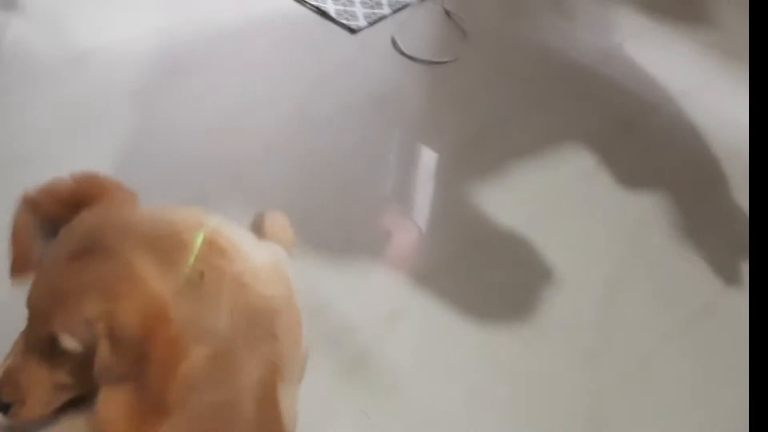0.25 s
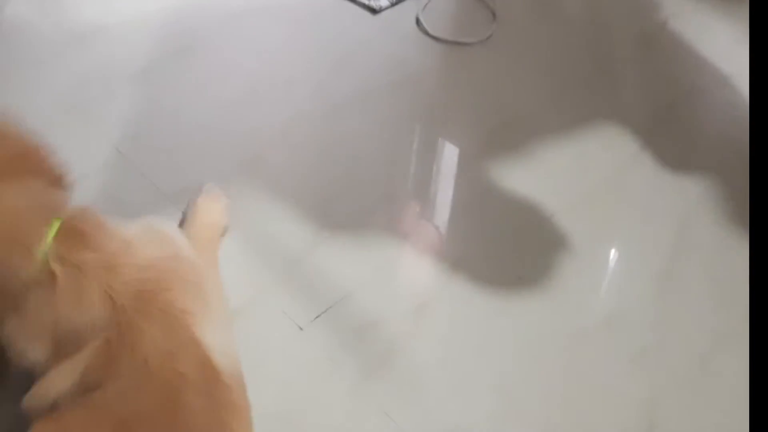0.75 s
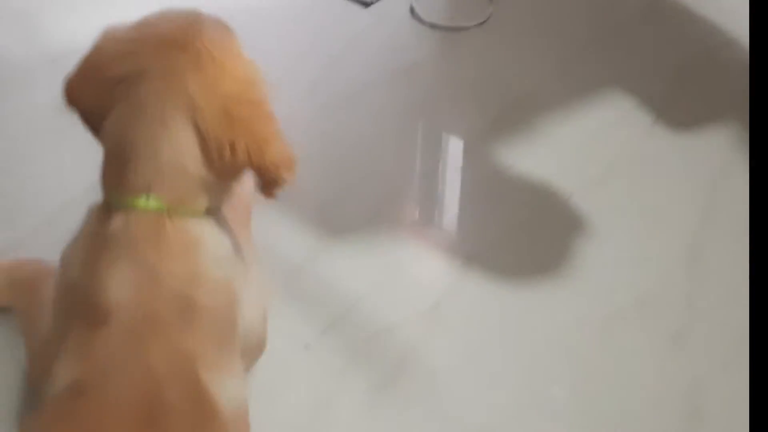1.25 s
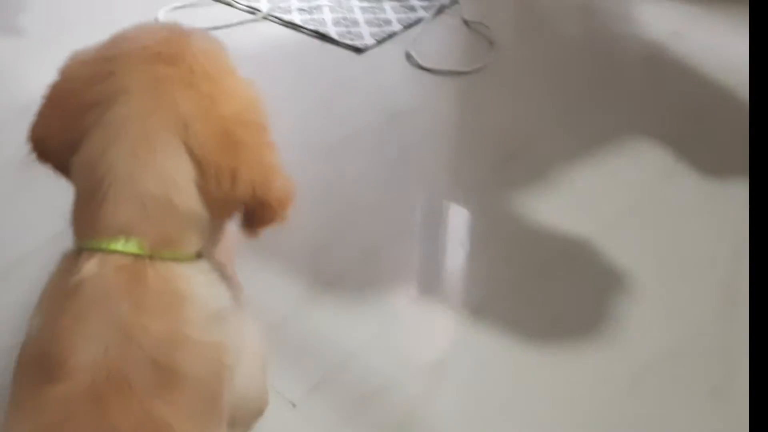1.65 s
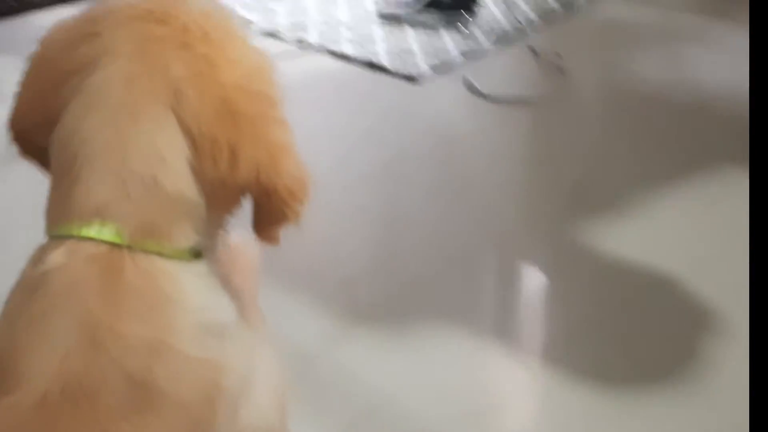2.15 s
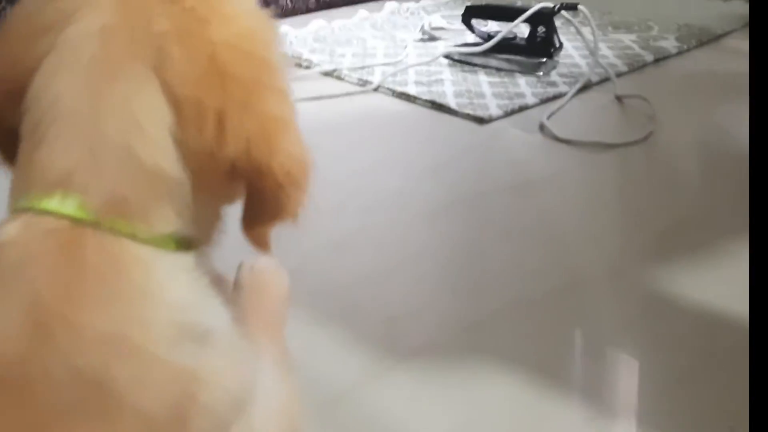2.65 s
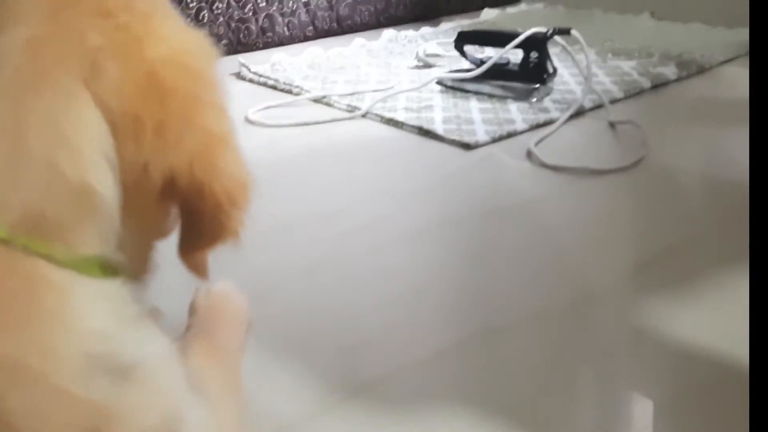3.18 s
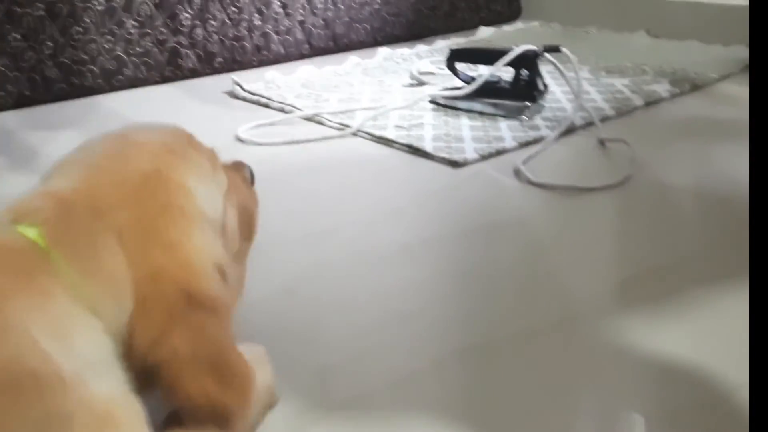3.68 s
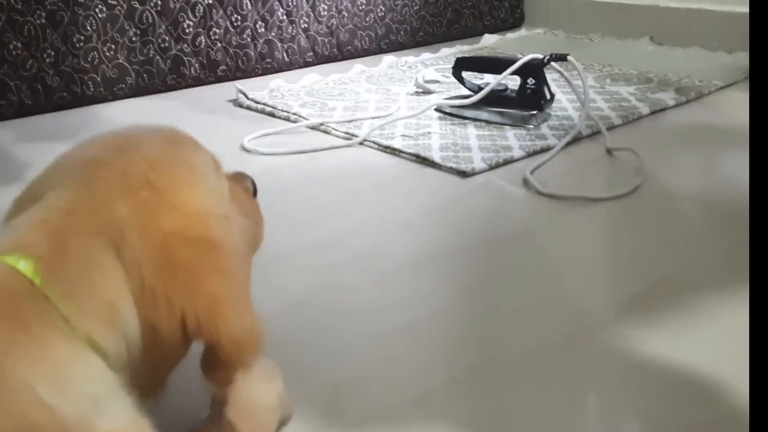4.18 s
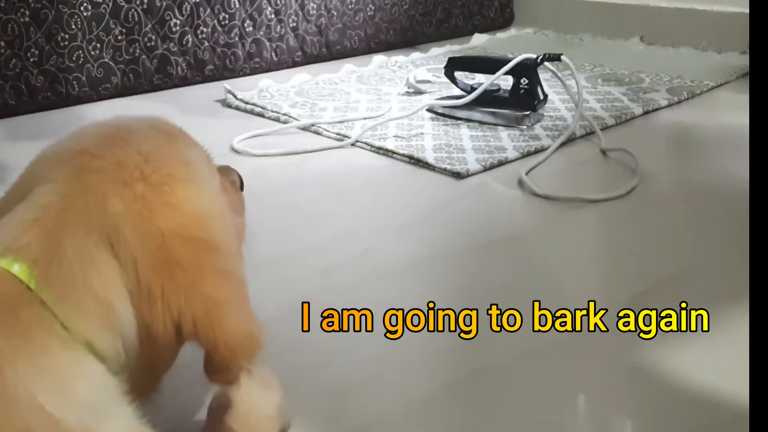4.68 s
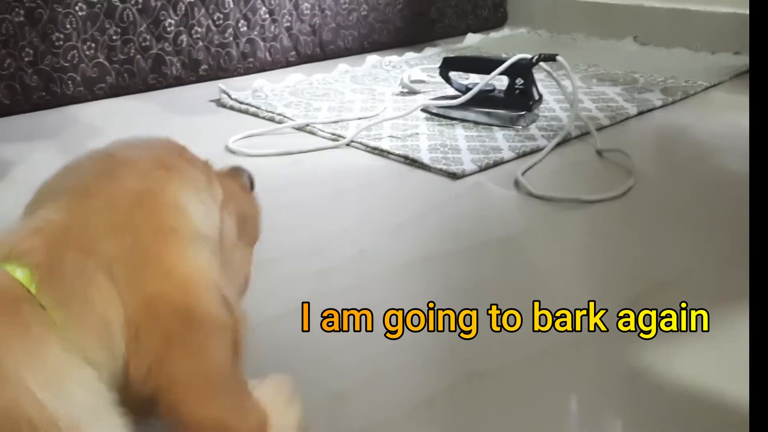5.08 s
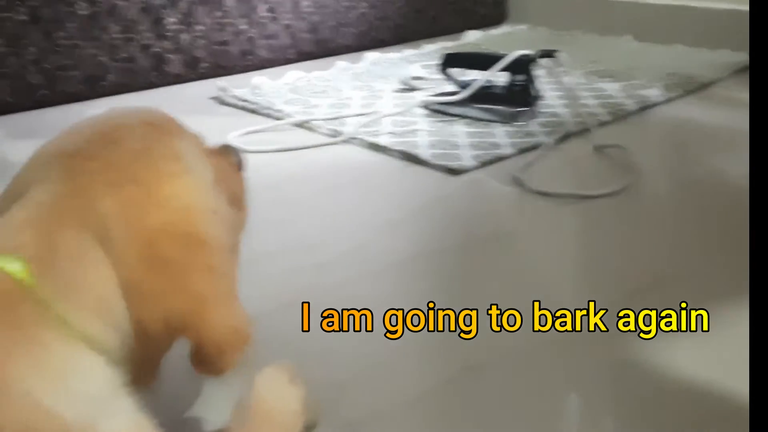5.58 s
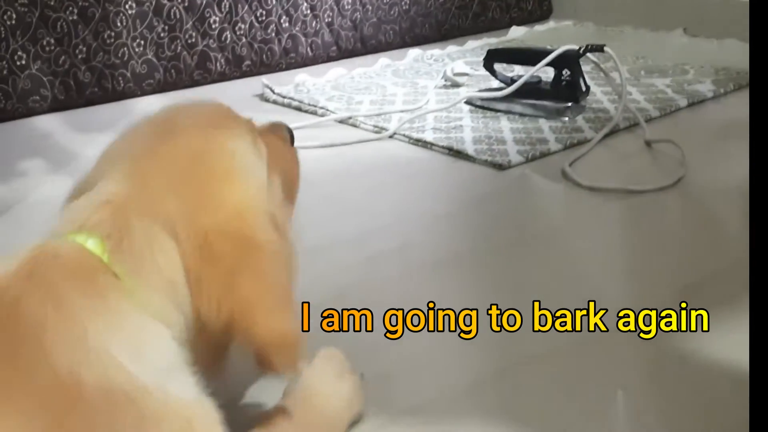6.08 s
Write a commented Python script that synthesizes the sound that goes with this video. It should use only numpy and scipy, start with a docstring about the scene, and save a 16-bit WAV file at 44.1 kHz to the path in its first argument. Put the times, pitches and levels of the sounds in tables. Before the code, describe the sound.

One short puppy bark, a swell of rushing air with low wind thumps, then three more hoarse-edged yaps echoing briefly off hard floor.

```python
"""The hoarse tail of an earlier bark fades over a faint low tone as a puppy starts the first of four barks.
It faces away from a handheld microphone with two ports, in a tiled room.
Each bark is a voice that swoops up as a nearly pure tone, breaks into a rasp and sinks to a growl.
Filtered noise makes a fan's rush, heard louder between the first two barks, and its draught on the ports.
A soft rub, a tiny tick and a knock of coloured noise mark the puppy moving on the floor."""
import sys
import numpy as np
from scipy import signal
from scipy.fft import rfft, irfft
from scipy.io import wavfile
from scipy.ndimage import uniform_filter1d, minimum_filter1d

SR = 44100
rng = np.random.default_rng(int(sys.argv[2]) if len(sys.argv) > 2 else 0)


def int16_out(signal):
    """Quantize to a 16-bit WAV file."""
    q = np.round(np.clip(np.atleast_2d(signal).T, -1, 1) * 32767)
    wavfile.write(sys.argv[1], SR, q.astype(np.int16))


N = 279153
TIME = np.arange(N) / SR


def amp(db):
    """Decibels to gain."""
    return 10 ** (np.asarray(db) / 20)


def unit(x):
    """Scales to rms 1."""
    return x / np.sqrt(np.mean(x ** 2) + 1e-20)


def read(points, hz):
    """Reads a table on a log-frequency axis."""
    f, value = np.transpose(points)
    return np.interp(np.log(hz + 1), np.log(f + 1), value)


def follow(rows, t):
    """Reads every column of a curve at times t."""
    s, *columns = np.transpose(rows)
    return [np.interp(t, s, c) for c in columns]


def add(mix, s, sound):
    """Lays a sound into the mix at time s."""
    part = mix[..., max(round(s * SR), 0):][..., :sound.shape[-1]]
    part += sound[..., :part.shape[-1]]


def colour(x, points):
    """Gives x a spectrum, at rms 1."""
    n = x.shape[-1]
    gain = amp(read(points, np.fft.rfftfreq(n, 1 / SR)))
    return unit(irfft(rfft(x) * gain, n))


def wander(size, rate_hz):
    """Smooth random curve of rms 1, mostly slower than the rate."""
    hz = np.fft.rfftfreq(size, 1 / SR)
    slow = np.exp(-(hz / rate_hz) ** 2) * (hz > 0)
    return unit(irfft(rfft(rng.standard_normal(size)) * slow, size))


def cut(x, hz, kind, order):
    """A low-pass or high-pass."""
    return signal.sosfilt(signal.butter(order, hz, kind, fs=SR, output="sos"), x)


def resonate(x, hz, width):
    """A resonance of gain 1 with steep skirts: shifts the curve hz to zero, smooths twice, shifts back."""
    turn = np.exp(2j * np.pi * np.cumsum(hz) / SR)
    r = np.exp(-np.pi * width * np.sqrt(2) / SR)
    smooth = signal.lfilter([(1 - r) ** 2], [1, -2 * r, r * r], x / turn)
    return 2 * (turn * smooth).real


def steady(x, size=700):
    """Holds the short-time rms at 1."""
    return x / np.sqrt(abs(uniform_filter1d(x ** 2, size)) + 1e-12)


def sides(pan_db):
    """Left and right gains of equal total power."""
    gains = amp(np.array([pan_db, -pan_db]) / 2)
    return gains / np.sqrt(np.mean(gains ** 2, axis=0))


def delay(x, ms):
    """Delays by any time, fractions of a sample included."""
    shift = np.exp(-2j * np.pi * np.fft.rfftfreq(2 * N, 1 / SR) * ms / 1000)
    return irfft(rfft(x, 2 * N) * shift, 2 * N)[:N]


def reflect(x, t60s, start_s):
    """Sparse reflections of random sign, different at each port, each band dying at its own speed."""
    size = SR // 2
    taps = rng.choice([-1., 1.], (2, size)) * (rng.random((2, size)) < 1 / 10) * (TIME[:size] > start_s)
    hz, t, z = signal.stft(taps, SR, nperseg=256)
    decay = np.exp(-np.log(1000) * t / read(t60s, hz)[:, None])
    tail = signal.istft(z * decay, SR, nperseg=256)[1]
    tail = tail / np.linalg.norm(tail, axis=1, keepdims=True)
    return signal.fftconvolve(x[None], tail, axes=1)[:, :N]


def fan(soft_db=-57, hum_hz=62, hum_db=-7):
    """Rushing air, partly alike at both ports and of another colour where heard loud, over the blades' hum."""
    # heard level of the rush: time_s, level_db
    heard_level = [(0, -53.5), (.5, -58.5), (1.25, -59), (1.45, -54.5), (1.7, -48), (2.1, -43.5),
                   (2.5, -42), (3.59, -41), (3.68, -49.5), (4.1, -54), (4.85, -55), (5.02, -47.5),
                   (5.2, -55.5), (6.33, -56.5)]
    # spectra of the air where heard loud and soft: frequency_hz, relative density_db [dB per Hz]
    loud_air = [(60, -10), (200, -17.5), (390, -7.5), (540, -5), (680, -9.5), (850, -18.5), (1100, -10),
                (1330, -11.5), (1530, -21.5), (1850, -16.5), (3000, -21), (4200, -27), (8000, -40),
                (9000, -49), (15500, -49)]
    soft_air = [(25, -30.5), (60, -8), (160, -11.5), (250, -6), (420, -18.5), (530, -8), (850, -20),
                (1250, -14.5), (1500, -20), (3000, -25), (4500, -32), (8000, -46), (9000, -57),
                (15500, -60.5)]
    # likeness of the air at the two ports: frequency_hz, correlation [0-1]
    likeness = [(60, 0.86), (300, 0.59), (550, .85), (950, 0.6), (1600, 0), (3000, 0.026), (16000, 0.57)]
    a, b = rfft(rng.standard_normal((2, N)))
    same = np.clip(read(likeness, np.fft.rfftfreq(N, 1 / SR)), -1, 1)
    air = irfft(np.array([a, same * a + np.sqrt(1 - same ** 2) * b]), N)
    flutter_db = .35 * wander(N, 14)
    level = amp(follow(heard_level, TIME)[0] + flutter_db)
    soft = np.minimum(level, amp(soft_db))
    hum = amp(hum_db) * unit(np.sin(2 * np.pi * hum_hz * TIME + .5 * wander(N, 3.7)))
    rush = soft * colour(air, soft_air) + (level - soft) * colour(air, loud_air)
    return rush + (level - 0.51 * soft) * hum


def draught(lumps_db=3, eddy_grit=0.3, puff_half_width_s=.045):
    """Lumpy turbulence, unrelated at the two ports, and single eddies that thump."""
    # heard level of the draught on the ports: time_s, level_db, left_minus_right_db
    heard_level = [(0, -48, 6), (.3, -73.5, 1.5), (1.45, -85, 4), (1.6, -60, 11.5), (2.01, -56, 16),
                   (2.035, -35, -4), (2.33, -36.5, -1.5), (2.45, -32, -21), (2.8, -25, -19), (2.88, -37, 4),
                   (3.17, -37.5, -7.5), (3.3, -25, -4), (3.5, -26.5, 0.5), (3.8, -45.5, -5.5),
                   (4.2, -50.5, 1), (4.7, -67, 3.5), (6.33, -60.5, -1.5)]
    # spectrum of the buffeting: frequency_hz, relative density_db [dB per Hz]
    buffet = [(15, -28), (30, -12), (50, -7.5), (75, 2.5), (140, -1), (250, -6.5), (400, -23.5), (800, -50),
              (2000, -52.5), (8000, -110)]
    # stray puffs after the main draught: centre_s, level_db, left_minus_right_db
    stray_puffs = [(4.14, -48.5, -17.5), (5.04, -44, 6.5), (5.29, -52.5, 8), (5.53, -40.5, -22.5),
                   (5.69, -48.5, -23.5), (6.08, -45.5, -7.5)]
    # eddies hitting a port: start_s, level_db before the decay, left_minus_right_db, pitch_hz
    eddies = [(2.026, -20, 6, 74.6), (2.056, -21.5, 8, 52), (2.186, -27.5, -12, 164), (2.245, -24, 3, 112),
              (2.536, -8, -38, 120), (2.566, -15.5, -21, 241), (2.644, -18, -30, 146),
              (2.73, -17.5, -33, 207), (2.8, -19.5, -24, 138), (2.94, -28, 19, 98),
              (3.267, -16.5, -28, 192), (3.3, -15.5, -15, 268), (3.884, -28, 19, 135),
              (4.111, -38.5, -30, 103.5), (4.458, -32, -26, 124), (5.531, -26, -28, 143)]
    grit_colour = [(100, -2.0), (400, -5.5), (900, -34.5), (3000, -78.5), (9000, -100)]  # (Hz, dB)
    level_db, pan_db = follow(heard_level, TIME)
    lumps = np.array([unit(amp(lumps_db * wander(N, 26)) * colour(rng.standard_normal(N), buffet))
                      for port in range(2)])
    puffs = sum(amp(db) * sides(pan)[:, None] * np.exp(-((TIME - s) / puff_half_width_s) ** 2)
                for s, db, pan in stray_puffs)
    out = (amp(level_db) * sides(pan_db) + puffs) * lumps
    t = TIME[:SR // 10]
    for s, db, pan, hz in eddies:
        u = t * hz / 0.46  # lower eddies swell and fade more slowly
        grit = eddy_grit * colour(rng.standard_normal(len(t)), grit_colour)
        push = np.sin(2 * np.pi * hz * t) + grit
        envelope = (u / 2) ** 2 * np.exp(2 - u) * np.exp(-t / 0.028)
        add(out, s, amp(db) * sides(pan)[:, None] * push * envelope)
    return out


def low_tone(blur=.45, blur_width_hz=110):
    """A soft, wavering sine, blurred by a band of noise just below its pitch."""
    # a faint tone that sags, then climbs under the first bark: time_s, pitch_hz, level_db
    curve = [(0, 232, -39), (.05, 190.8, -39.5), (.16, 194, -45), (.24, 175, -55.5), (.29, 214.8, -57),
             (.355, 262.5, -49.5), (.42, 272, -65.5)]
    hz, db = follow(curve, TIME)
    phase = 2 * np.pi * np.cumsum(hz * (1 + .02 * wander(N, 45))) / SR
    edge = unit(resonate(rng.standard_normal(N), hz * .85, blur_width_hz))
    fade_out = np.clip((curve[-1][0] - TIME) / 0.018, 0, 1)
    return amp(db) * unit(unit(np.sin(phase)) + blur * edge) * fade_out


def rub():
    """Fur drags unevenly over the tiles as the puppy shifts: dull noise of wavering strength."""
    # strength of the rub: time_s, level_db
    strength = [(0, -81.5), (.6, -64.5), (1, -63.5), (1.3, -63), (1.5, -57), (1.9, -50), (2.05, -61),
                (2.3, -87)]
    # spectrum of the dragging fur: frequency_hz, relative density_db [dB per Hz]
    fur = [(100, -35.5), (230, -8), (330, 1), (420, -0.5), (560, -20), (1500, -33), (8000, -70.5)]
    a, b = rng.standard_normal((2, N))
    drag = colour(np.array([a + .4 * b, a - 0.48 * b]), fur)
    return drag * amp(follow(strength, TIME)[0] + 2.5 * wander(N, 16))


def tick(tick_db=-58, knock_db=-47):
    """A tiny tick and a soft knock, as of a claw and paw on the tiles: decaying coloured noise."""
    tick_s, knock_s = 1.625, 1.648
    out, t = np.zeros((2, N)), TIME[:SR // 2]
    noise = rng.standard_normal((2, len(t)))
    claw = colour(noise, [(1000, -4), (7000, 6), (14000, -1)])
    add(out, tick_s, amp(tick_db) * claw * np.exp(-t / 0.02))
    paw = colour(noise[0], [(100, -39), (260, 10), (380, -5), (520, 7), (900, -26), (6000, -65)])
    add(out, knock_s, amp(knock_db) * paw * np.exp(-t / 0.1) * (1 - np.exp(-t / 0.0014)))
    return out


def gesture(start, lead_s, tone_s, rasp_s, tail_s, swell_s, start_hz, top_hz, lead_db, lead_high_db,
            tone_db, tone_high_db, rasp_db, spent_db, tail_db, gape, rasp_gape, hiss_db):
    """One bark's control rows for bark(): hoarse lead-in, pure rising tone, rasp, sinking growl."""
    # attack, the voice clearing, the break into the rasp, the drop out of it, release
    attack_s, clearing_s, break_s, drop_s, release_s = 0.0094, .03, 0.011, .014, .05
    # the rise flattens towards the top, sags to a share of it in rasp and drop, then sinks to a growl
    rise_bend, rasp_sag, drop_sag, growl_hz, last_hz = 1.3, .85, .73, 372, 230
    # depth of attack and release, growth in the lead-in, the fundamental's loss at the break
    attack_db, release_db, lead_growth_db, break_loss_db = 11, 19.5, 7, 6
    # overtones: the arch of the rasp, the drop after it, below the fundamental in the growl
    rasp_arch_db, drop_db, growl_dull_db = 2.5, 14, 15
    rough_lead, rough_clearing, rough_tone, rough_rasp, rough_tail = .65, .12, 0.027, .66, .58  # 0-1
    hiss_follow = 0.81  # the hiss follows the overtones, dB per dB
    lead_hiss_db = 1  # extra air escapes before the voice clears
    # in the rasp the mouth narrows from above to below its gape, and it trembles
    mouth_closing, mouth_quiver = 0.028, .025
    unsteady_db, unsteady_hz = 2, 55  # a rough voice also wavers in strength

    tone, crack, drop, growl, end = np.cumsum([lead_s, tone_s, rasp_s, tail_s, release_s])
    t = np.arange(0, end, 1 / SR)
    pure, broken, dropped = crack - break_s / 2, crack + break_s / 2, drop + drop_s

    def through(*stages):
        """Straight lines from stage to stage."""
        return follow(sorted(stages), t)[0]

    rise = top_hz - (top_hz - start_hz) * np.maximum(1 - t / crack, 0) ** rise_bend
    fall = through((crack, top_hz), (drop, top_hz * rasp_sag), (dropped, top_hz * drop_sag),
                   (growl, growl_hz), (end, last_hz))
    low_db = through((0, lead_db - attack_db), (attack_s, lead_db),
                     (tone - swell_s, lead_db + lead_growth_db), (tone, tone_db), (pure, tone_db),
                     (broken, tone_db - break_loss_db), (drop, spent_db),
                     (dropped, tail_db), (growl, tail_db), (end, tail_db - release_db))
    first_db = lead_high_db - lead_growth_db
    growl_high_db = tail_db - growl_dull_db
    high_db = through((0, first_db - attack_db), (attack_s, first_db), (clearing_s, lead_high_db),
                      (pure, tone_high_db), (broken, rasp_db - 2 * rasp_arch_db),
                      (crack + rasp_s / 2, rasp_db), (drop, rasp_db - rasp_arch_db),
                      (dropped, rasp_db - drop_db), (growl, growl_high_db),
                      (end, growl_high_db - release_db))
    air_db = hiss_db + hiss_follow * high_db + through((clearing_s, lead_hiss_db), (pure, 0))
    rough = through((attack_s, rough_lead), (clearing_s, rough_clearing), (tone, rough_tone),
                    (pure, rough_tone), (broken, rough_rasp), (dropped, rough_tail),
                    (growl, rough_tail), (end, 1))
    waver, quiver = (wander(SR, unsteady_hz)[:len(t)] for _ in range(2))
    mouth = through((clearing_s, gape), (crack, rasp_gape + mouth_closing),
                    (drop, rasp_gape - mouth_closing), (growl, 1))
    mouth = mouth * (1 + mouth_quiver * quiver)
    hz = np.where(t < crack, rise, fall)
    return np.transpose([start + t, hz, low_db + unsteady_db * rough * waver, high_db, rough, air_db, mouth])


def bark(rows, jitter=.11, shimmer=0.29, rasp=.85, slope=1.0, open_bright_db=27, bark_top_hz=3300,
         chest_width_hz=480, throat_low_hz=880):
    """Vocal folds swing cleanly or chaotically; gives the fundamental and the overtones with their hiss."""
    # throat resonances: centre_hz before the mouth factor, width_hz, level_db before the mouth's tilt
    throat = [(815, 300, -0.5), (1309, 125, 2), (1825, 190, -2), (2310, 310, -5.5), (2750, 720, -16.5)]
    # air rushing past the teeth: frequency_hz, relative density_db [dB per Hz]
    teeth = [(1500, -39.5), (3000, 3), (3800, 2), (5200, -2), (6500, 0.5), (8000, 3.5), (8900, -7.5),
             (10800, -13.5), (12300, -7), (15500, -23)]
    t = np.arange(rows[0][0], rows[-1][0], 1 / SR)
    size = len(t)
    hz, low_db, high_db, rough, hiss_db, mouth = follow(rows, t)
    rough = np.clip(rough, 0, 1)
    turns = np.cumsum(hz * (1 + jitter * rough * wander(size, 260))) / SR
    swing = 1 + shimmer * rough * wander(size, 180)  # uneven strength from cycle to cycle
    puffs = unit((.5 + np.exp(-(turns % 1) / 0.18)) * rng.standard_normal(size))

    noisy = np.clip(rasp * rough, 0, 1)
    # the fundamental smears into a band
    chest = steady(resonate(resonate(puffs, hz, chest_width_hz), hz, chest_width_hz))
    clean = unit(swing * np.sin(2 * np.pi * turns))
    low = np.sqrt(1 - noisy ** 2) * clean + noisy * chest

    folds = swing * sum(np.cos(2 * np.pi * k * turns) / k ** slope for k in range(2, 10))
    folds *= 1 + .45 * rough * np.cos(np.pi * turns)  # strong and weak pulses alternate in the rasp
    tilt_db = open_bright_db * (mouth - 1)  # per octave: a wider mouth is brighter

    def through_throat(drive):
        """Sums the throat resonances, neighbours in opposite sign."""
        return steady(sum((-1) ** k * amp(db + tilt_db * np.log2(f / throat[0][0]))
                          * resonate(drive, f * mouth, width)
                          for k, (f, width, db) in enumerate(throat)))

    airy_share = .02 + .7 * rough ** 1.5
    high = np.sqrt(1 - airy_share) * through_throat(folds) + np.sqrt(airy_share) * through_throat(puffs)
    high = cut(cut(high, bark_top_hz, "low", order=14), throat_low_hz, "high", order=4)
    hiss = amp(hiss_db) * colour(puffs, teeth)
    fade = signal.windows.tukey(size, .03)
    return fade * np.array([amp(low_db) * steady(low), amp(high_db) * steady(high) + hiss])


def puppy(port_lag_ms=.15, low_db=-1.5, direct_db=-4, scatter_db=-3, room_db=-18, room_high_db=-12):
    """The fundamental spreads all round; the overtones are aimed away and return largely off the tiles."""
    # one row a bark, levels at the voice: start_s, lead_in_s, tone_s, rasp_s, tail_s, swell_into_tone_s,
    # start_hz, top_hz, lead_in_db, lead_in_overtones_db, tone_db, tone_overtones_db, rasp_overtones_db,
    # fundamental_at_rasp_end_db, tail_db, gape_at_start [factor], gape_in_rasp [factor], hiss_offset_db
    barks = [ (.083, .057, .046, .06, 0.042, 0.0065, 420.8, 862, -43.5, -18, -9, -23.5, -23.5, -27.5, -44, .95, .97, -32),
             (3.59, .03, 0.028, .064, 0.081, 0.017, 441, 722.5, -15.5, -11.5, -6.5, -22, -12, -20.5, -24.5, 1.115, 0.98, -33),
             (5.046, 0.036, 0.041, .052, .073, .011, 424.9, 787, -28, -21.5, -5.5, -20, -9, -24.5, -24.5, 1.08, 0.964, -33.5),
             (6.121, .062, .02, 0.069, 0.066, 0.036, 388.7, 765.4, -34, -32.5, -7.5, -20, -10, -23, -22.5, 1.11, 0.97, -33.5)]
    # hoarse tail of an earlier bark, fading as the first bark starts, levels at the voice: time_s,
    # pitch_hz, fundamental_db, overtones_db, roughness [0-1], hiss_db, mouth [factor]
    earlier_tail = [(0, 670, -29, -33.5, 1, -54.5, 0.97), (.03, 640, -37.5, -46.5, .95, -67.5, 1.03),
                    (.065, 340, -40.5, -40.5, .8, -72.5, 1.08), (.11, 326, -38, -43, .7, -77, 1.2),
                    (.135, 320, -53.5, -70.5, .2, -79, 1)]
    # hard surfaces near the puppy, one list for the left then the right port: delay_ms, gain [factor]
    echoes = [
        [(6.4, 0.061), (11.2, 0.13)],
        [(4.4, 0.028), (7.3, 0.17)],
    ]
    # dying away of the tiled room: frequency_hz, t60_s
    room_decay = [(150, 0.2), (700, 0.31), (2000, 0.22), (4000, 0.27), (8000, 0.23), (16000, 0.081)]
    voice = np.zeros((2, N))
    for rows in [earlier_tail] + [gesture(*row) for row in barks]:
        add(voice, rows[0][0], bark(rows))
    low, high = voice
    near = amp(low_db) * np.array([low + sum(g * delay(low, ms) for ms, g in port) for port in echoes])
    near += amp(direct_db) * np.array([high, delay(high, port_lag_ms)])
    near += amp(scatter_db) * reflect(high, [(500, .07), (8000, 0.05)], start_s=.001)
    room_send = amp(room_db) * low + amp(room_high_db) * high
    return near + reflect(room_send, room_decay, start_s=0.016)


def scene():
    """Everything at the two ports."""
    return puppy() + fan() + draught() + low_tone() + tick() + rub()


def record(dry, bass_cut_hz=36, edge_hz=15700, ceiling=.95):
    """The microphone's bass cut, a quick peak limiter, then the band limit."""
    x = cut(dry, bass_cut_hz, "high", order=4)
    headroom = ceiling / np.maximum(abs(x), ceiling)
    x = x * uniform_filter1d(minimum_filter1d(headroom, size=301), size=301)
    band_limit = signal.firwin(511, edge_hz, window=("kaiser", 9), fs=SR)
    return signal.oaconvolve(x, band_limit[None], "same")


dry = scene()
out = record(dry)
int16_out(out)
```